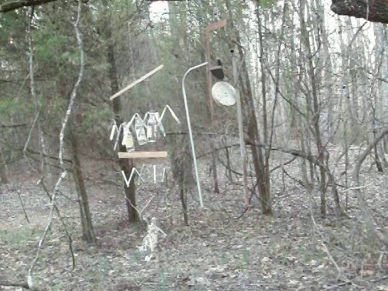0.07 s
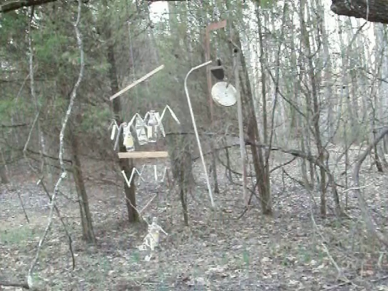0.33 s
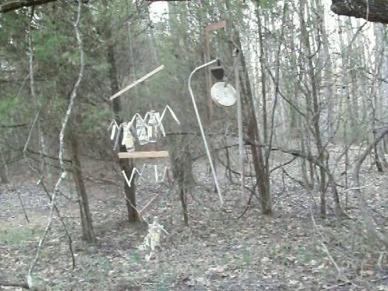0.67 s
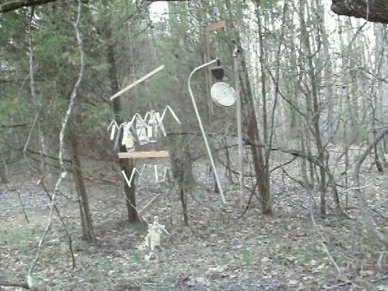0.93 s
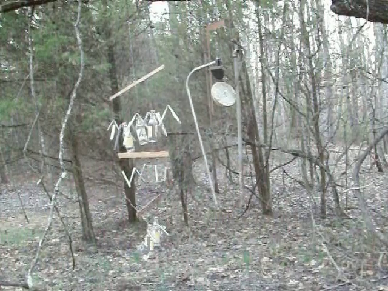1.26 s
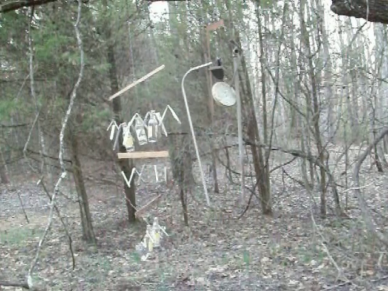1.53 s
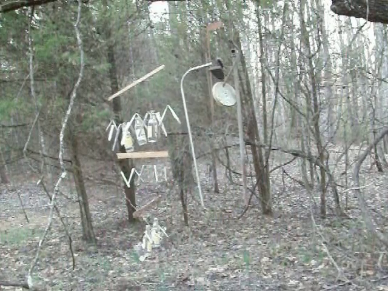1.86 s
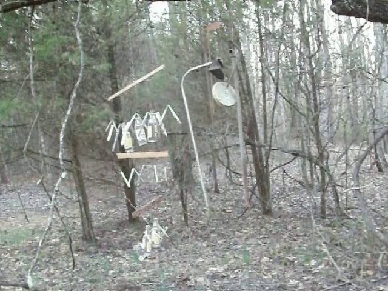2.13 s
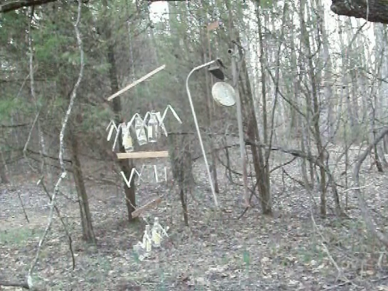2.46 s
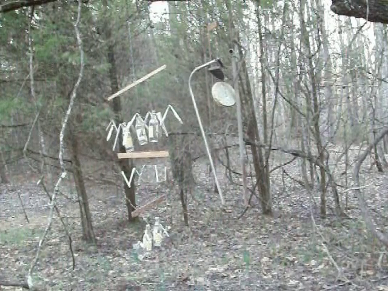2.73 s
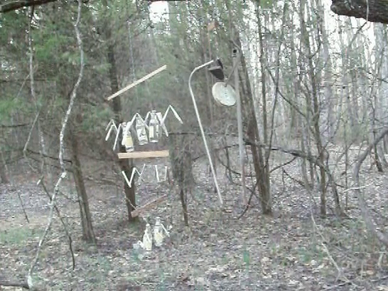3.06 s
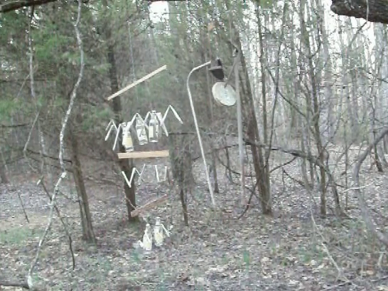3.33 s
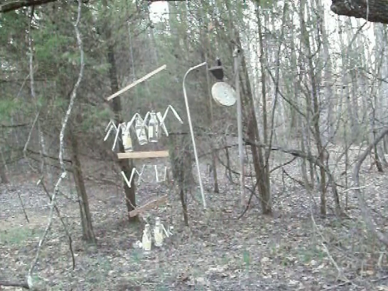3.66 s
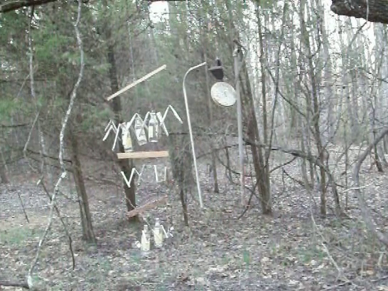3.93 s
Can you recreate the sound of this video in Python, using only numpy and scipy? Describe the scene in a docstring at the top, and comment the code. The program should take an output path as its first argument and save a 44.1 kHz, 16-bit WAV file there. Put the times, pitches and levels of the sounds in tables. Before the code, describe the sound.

A sudden clatter of snapping twigs and crackling leaves breaks faint woodland rumble and hiss.

```python
"""Dry twigs snap in a sudden clatter in quiet woodland, heard through a small camera's microphone.
A hanging piece of wood is knocked and rings, stirred leaves crackle, the litter thuds, and a few more
clacks follow as things settle. The trunks all around scatter the clacks and knocks over a low outdoor
rumble and faint microphone hiss. The camera's coarse converter starts with a pop and a short buzz,
then adds hiss of its own."""
import sys
import numpy as np
from scipy import signal
from scipy.fft import rfft, irfft
from scipy.io import wavfile

SR = 44100
rng = np.random.default_rng(int(sys.argv[2]) if len(sys.argv) > 2 else 0)


def store_wav(level_fs):
    """Save 16-bit WAV to argv[1]."""
    pcm = np.round(np.clip(np.atleast_2d(level_fs), -1, 1) * 32767)
    wavfile.write(sys.argv[1], SR, pcm.T.astype(np.int16))


N = 176400
TIME = np.arange(N) / SR


CLACK_DB, BODY_DB, SPLINTER_DB = 2.5, -0.5, -1.5  # added to the table's three levels
TICK_T60_S, BODY_T60_S, SPLINTER_T60_S = 0.0035, 0.019, 0.019
# Twigs and hanging pieces among the trees; body and splinters are relative to the tick:
# (time [s], level [dB], pitch [Hz], hollow body [dB], splinters [dB])
TWIG_CLACKS = [(2.7318, -27, 4100, -20, -12), (2.7365, -23, 4060, -14, -9), (2.7505, -20, 4100, -28, -9),
               (2.7598, -7.5, 3750, -26, -20), (2.7726, -14, 4100, -26, -13), (2.778, -20, 3580, -21, -13),
               (2.7829, -13, 3300, -30, -15), (2.7868, -20, 2900, -24, -16), (2.8047, -23, 2600, -18, -14),
               (2.8335, -17.5, 2900, -14, -11), (2.8545, -22, 4450, -15, -11),
               (2.8838, -18, 2900, -11, -11), (2.9483, -20.5, 4300, -22, -16),
               (2.9962, -24.5, 3890, -24, -16), (3.040, -30, 4370, -20, -14), (3.0935, -26, 4200, -21, -17),
               (3.1725, -26, 4100, -18, -8), (3.1927, -17, 4100, -20, -14), (3.195, -19, 3900, -20, -15),
               (3.2152, -22, 4370, -15, -12), (3.344, -24, 3840, -20, -12), (3.4926, -16, 3400, -34, -23),
               (3.7724, -25.5, 4300, -22, -19), (3.9615, -20, 3300, -20, -19)]

def twig_clacks():
    """Each snap or clack is a tick of a few cycles, a short hollow body and a spray of splinters."""
    out, t = np.zeros(N), TIME[:SR // 12]
    for start, db, hz, body_db, splinter_db in TWIG_CLACKS:
        tick = np.sin(2 * np.pi * hz * t) * decay(t, TICK_T60_S)
        body = from_db(BODY_DB + body_db) * band_noise(len(t), 700, 1600) * decay(t, BODY_T60_S)
        spray = band_noise(len(t), 2600, 5800)
        splinters = from_db(SPLINTER_DB + splinter_db) * spray * decay(t, SPLINTER_T60_S)
        add(out, start, from_db(db + CLACK_DB) * (tick + body + splinters))
    return out


# Modes of the hanging wood: (frequency [Hz], level [dB], time to fall 60 dB [s])
WOOD_MODES = [(340, -21, .07), (716, -9, .17), (926, -9, .1), (1060, -14, .04), (1310, -5, .055),
              (1461, -5, .06), (1620, -8, .03), (2640, -10, .02), (2900, -11, .025), (4230, -9, .014)]
# Knocks on it: (time [s], level [dB])
WOOD_KNOCKS = [(2.7095, -20.5), (2.7365, -49), (2.884, -37), (3.154, -38.5)]

def hanging_wood(scuff_db=-11.5, scuff_t60_s=0.096, attack_s=0.0006):
    """Every knock rings the same modes, and the rough contact adds a short scuff."""
    out, t = np.zeros(N), TIME[:SR // 3]
    ring = sum((-1) ** k * from_db(db) * np.sin(2 * np.pi * hz * t) * decay(t, t60)
               for k, (hz, db, t60) in enumerate(WOOD_MODES))
    attack = 1 - np.exp(-t / attack_s)
    for start, db in WOOD_KNOCKS:
        scuff = from_db(scuff_db) * band_noise(len(t), 400, 4000) * decay(t, scuff_t60_s)
        add(out, start, from_db(db) * (ring + scuff) * attack)
    return out


# How hard the dry leaves are stirred: (time [s], level [dB])
LEAF_STIR = [(2.38, -68), (2.44, -47), (2.56, -60), (2.67, -52), (2.705, -58), (2.755, -44), (2.80, -35),
             (2.83, -39), (2.88, -40), (2.98, -42), (3.05, -48), (3.165, -51), (3.178, -36), (3.22, -37),
             (3.245, -53), (3.35, -47), (3.38, -52), (3.5, -48), (3.56, -54), (3.63, -48), (3.72, -56),
             (3.85, -54), (3.96, -50), (3.975, -47), (4.0, -51)]
# Their colour at the microphone: (frequency [Hz], relative level [dB])
LEAF_SPECTRUM = [(150, -28.5), (400, -15), (850, -7.5), (1800, -10), (2600, 0), (3600, 2), (4600, 3),
                 (5700, -3.5)]

def dry_leaves(crackles_per_s=2500, spread_db=5, gain_db=5.5):
    """Dense tiny crackles of uneven size, as loud as the leaves are stirred."""
    crackles = rng.random(N) < crackles_per_s / SR
    sizes = from_db(spread_db * np.minimum(rng.exponential(1, N), 4))
    signs = rng.choice([-1, 1], N)
    stir_db = np.interp(TIME, *np.transpose(LEAF_STIR), left=-100)
    return coloured(crackles * sizes * signs, LEAF_SPECTRUM) * from_db(gain_db + stir_db)


# Thuds down on the woodland floor: (time [s], level [dB], Gaussian width [s])
LITTER_THUDS = [(2.727, -47.5, 0.035), (2.931, -47.5, .09), (3.206, -39.5, 0.026), (3.46, -46, 0.094),
                (3.663, -51.5, 0.07), (3.892, -45, 0.0088), (3.957, -44.5, 0.017)]
# Their colour at the microphone: (frequency [Hz], relative level [dB])
THUD_SPECTRUM = [(60, -3.5), (110, -5.5), (155, 1.5), (230, -7), (350, -9), (550, -10.5), (820, -9),
                 (1500, -18.5), (4000, -66.5)]

def litter_thuds():
    """Dull thuds in the leaf litter, each a soft swell of low noise."""
    swells = sum(from_db(db) * np.exp(-.5 * ((TIME - centre) / width) ** 2)
                 for centre, db, width in LITTER_THUDS)
    return swells * coloured(rng.standard_normal(N), THUD_SPECTRUM)


def trunk_echoes(x, count=200, level_db=-14, t60_s=0.22):
    """Trunks scatter sparse echoes; those from farther off arrive later and weaker."""
    delays = rng.uniform(0.0044, .25, size=count)
    echoes = np.zeros(SR)
    echoes[(delays * SR).astype(int)] = rng.standard_normal(count) * decay(delays, t60_s)
    return from_db(level_db) * signal.fftconvolve(x, echoes / np.linalg.norm(echoes))[:N]


# Outdoor rumble and the microphone's own hiss: (frequency [Hz], relative level [dB])
RUMBLE_AND_HISS_SPECTRUM = [(12, -9), (30, -3), (45, -2), (55, -5), (90, -7.5), (125, -14), (175, -12.5),
                            (260, -21), (700, -24.5), (1400, -27.5), (2800, -30.5), (4600, -32.5),
                            (5700, -41)]

def rumble_and_mic_hiss(level_db=-44):
    """Low outdoor rumble plus the microphone's own faint electronic hiss."""
    return from_db(level_db) * coloured(rng.standard_normal(N), RUMBLE_AND_HISS_SPECTRUM)


SWITCH_ON_S, AWAKE_S = .0727, .297

def input_buzz(hz=67, height=.038, unevenness=0.34):
    """A sawtooth with uneven teeth that stops once the camera's input is awake."""
    tooth, phase = np.divmod(TIME * hz + .5, 1)
    heights = height * (1 + unevenness * rng.standard_normal(int(tooth[-1]) + 1))
    return heights[tooth.astype(int)] * (phase - .5) * (TIME < AWAKE_S)


def waking_input(x):
    """The input fades in on an offset, buzzing; after a bump the offset and its hiss drain away."""
    wake_db_per_s, hiss_db = 66.5, -50
    start_offset, rest_offset, drain_s = -.32, -.029, .125
    bump_s, bump_height, bump_decay_s = .2895, .055, .003
    fade_in = from_db(wake_db_per_s * np.minimum(TIME - AWAKE_S, 0))
    charge = np.exp(-np.maximum(TIME - AWAKE_S, 0) / drain_s)
    offset = rest_offset + (start_offset - rest_offset) * charge
    bump = bump_height * np.exp(-np.abs(TIME - bump_s) / bump_decay_s) * (TIME > bump_s)
    hiss = from_db(hiss_db) * charge * fade_in * band_noise(N, 2400, 4500)
    return (x + hiss) * fade_in + offset + input_buzz() + bump


def from_db(db):
    """Decibels to gain."""
    return 10 ** (np.asarray(db) / 20)


def decay(t, t60):
    """Exponential fall of 60 dB every t60 seconds."""
    return from_db(-60 * t / t60)


def unit_rms(x):
    """Scale to rms 1."""
    return x / np.sqrt(np.mean(x ** 2) + 1e-20)


def coloured(x, spectrum):
    """Shape a signal by (frequency [Hz], level [dB]) points; rms 1."""
    hz, db = np.transpose(spectrum)
    bin_hz = np.maximum(np.fft.rfftfreq(N, 1 / SR), 1)
    gain = from_db(np.interp(np.log(bin_hz), np.log(hz), db))
    return unit_rms(irfft(rfft(x) * gain, N))


def band_noise(samples, low_hz, high_hz):
    """Gently band-passed noise; rms 1."""
    band = signal.butter(2, [low_hz, high_hz], "band", fs=SR, output="sos")
    return unit_rms(signal.sosfilt(band, rng.standard_normal(samples)))


def low_pass(x, hz, taps):
    """Steep low-pass without delay."""
    return signal.fftconvolve(x, signal.firwin(taps, hz, window=("kaiser", 9), fs=SR), "same")


def add(out, start_s, sound):
    """Mix a sound in at a time."""
    i = int(start_s * SR)
    out[i:i + len(sound)] += sound[:max(N - i, 0)]


def scene():
    """The clatter among the trees, in mono, over outdoor rumble and microphone hiss."""
    hits = twig_clacks() + hanging_wood()
    background = rumble_and_mic_hiss()
    return (hits + trunk_echoes(hits) + dry_leaves() + litter_thuds() + background)[None]


def record(dry):
    """The camera's slow, coarse converter adds hiss and cuts the treble; switching on makes a pop."""
    converter_hz, step = 12000, .0072
    sampled = signal.resample_poly(waking_input(dry[0]), converter_hz, SR, padtype="edge")
    rounding_error = step * np.round(sampled / step) - sampled
    sound = signal.resample_poly(sampled, SR, converter_hz, padtype="edge")[:N]
    hiss = signal.resample_poly(rounding_error, SR, converter_hz, padtype="edge")[:N]
    hiss = low_pass(hiss, hz=5600, taps=151)
    sound = low_pass(sound + hiss, hz=6000, taps=301)
    switched_on = sound * (TIME > SWITCH_ON_S)  # the jump to the offset is the wide-band pop
    return low_pass(switched_on, hz=16000, taps=201)[None]


dry = scene()
out = record(dry)
store_wav(out)
```